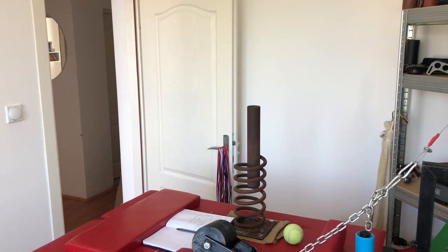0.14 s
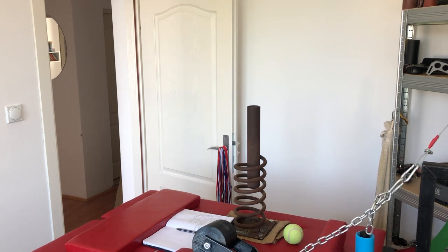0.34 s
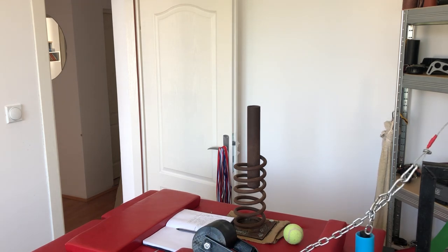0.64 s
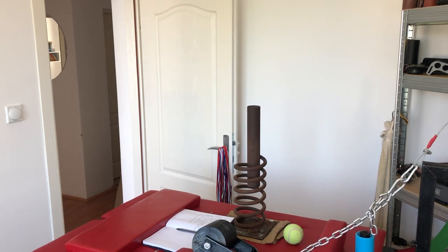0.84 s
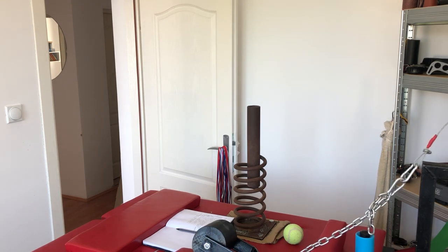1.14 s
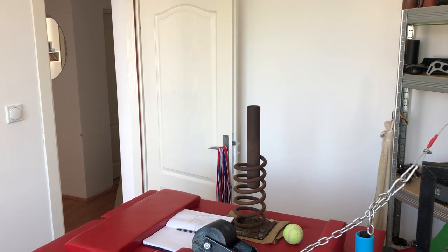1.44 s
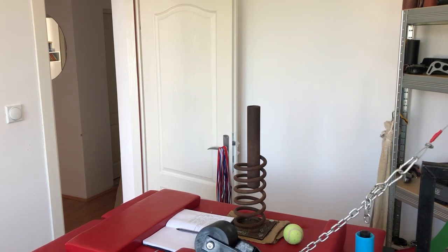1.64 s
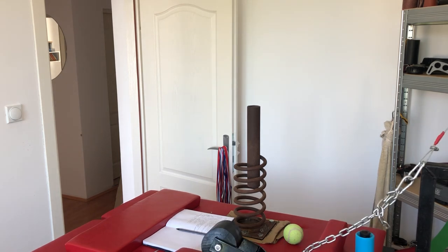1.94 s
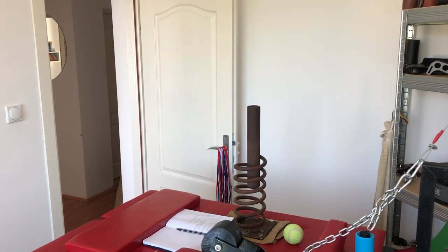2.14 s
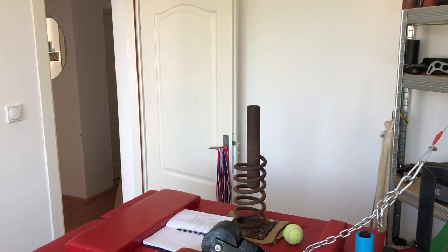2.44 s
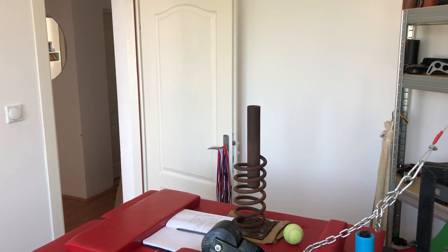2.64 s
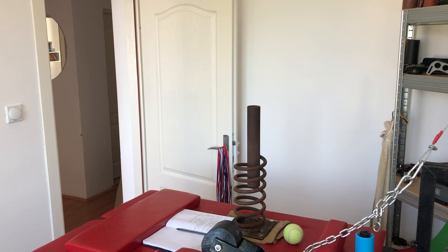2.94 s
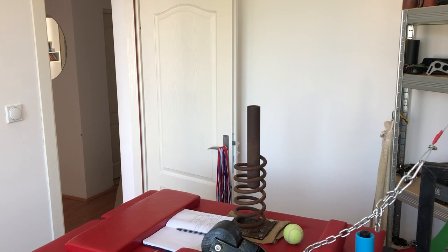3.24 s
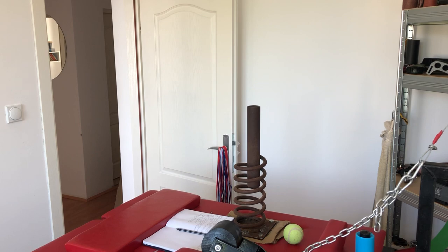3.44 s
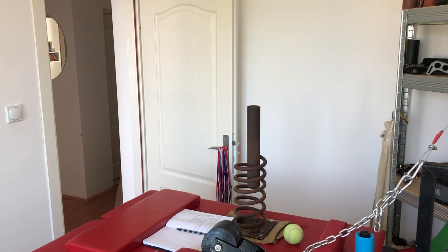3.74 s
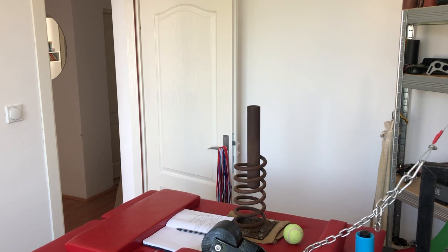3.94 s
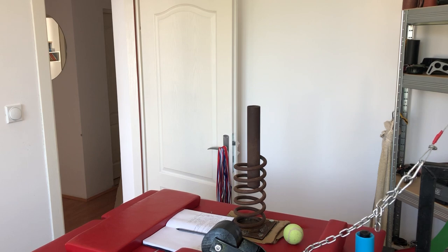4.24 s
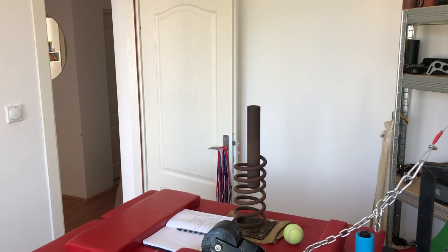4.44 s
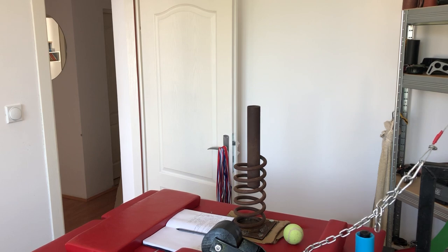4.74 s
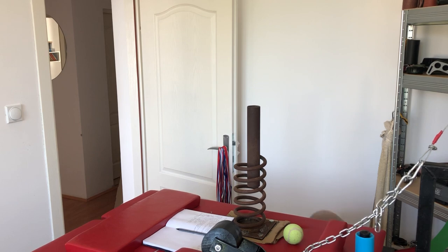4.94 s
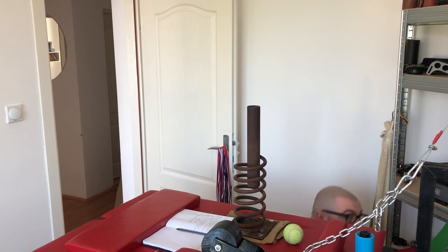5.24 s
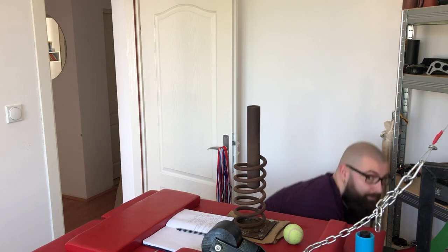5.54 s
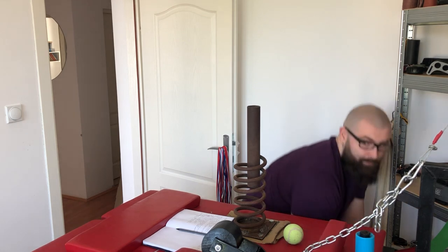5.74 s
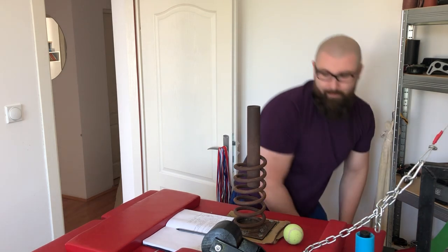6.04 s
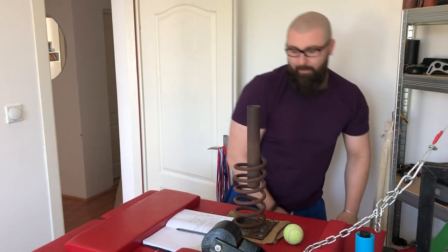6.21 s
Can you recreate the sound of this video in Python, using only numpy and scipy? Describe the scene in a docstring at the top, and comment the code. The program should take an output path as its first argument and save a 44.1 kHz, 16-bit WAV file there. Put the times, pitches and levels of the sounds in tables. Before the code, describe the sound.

Quiet chain ticks, a dragged iron plate's boom and loud ringing clank, then small metallic knocks, settling taps and soft clothing rustle over faint room hiss.

```python
"""Iron weight plates are shifted, dragged and dropped onto a loading pin, below a table in a small bare room.
Each blow rings a large plate, a small plate or the floor as decaying sines, with noise bursts for the contact.
Rumbling floor, grinding iron and a jingling chain are filtered random clicks, and so is the rustle of clothes.
The plates lie out of the microphone's sight, so much of their sound comes as room echo; air, hiss and hum lie below."""
import sys
import numpy as np
from scipy import signal
from scipy.io import wavfile
from scipy.ndimage import uniform_filter1d, minimum_filter1d

SR = 44100
rng = np.random.default_rng(int(sys.argv[2]) if len(sys.argv) > 2 else 0)


def unload_audio(sound):
    """Save the sound as a 16-bit wav file, at the path given as the first command line argument."""
    columns = np.transpose(np.atleast_2d(sound))
    # keep every value between -1 and 1, then stretch to whole-number steps
    steps = np.round(np.clip(columns, -1, 1) * 32767)
    wavfile.write(sys.argv[1], SR, steps.astype(np.int16))


N = 280976

# All levels are set before the mix of direct sound and echo in scene().

# large plate meets the floor or the pin:
# (time [s], floor thud [dB], plate ring [dB], contact [dB], contact tilt [dB per octave])
HEAVY_BLOWS = [(0.017, -38, -82, -46.5, -2), (1.195, -33, -43, -25, -7), (1.228, -27.5, -79, -49, -3),
               (1.403, -32, -72, -43, -5.5), (1.481, -42, -67, -37, -7.5), (1.531, -43, -51, -24.5, -12),
               (1.556, -40, -55, -27, -16), (1.829, -30.5, -74, -30.5, -4.5), (1.868, -4, -54.5, -15.5, -4),
               (1.917, -24.5, -59.5, -29.5, -8.5), (2.141, -55.5, -43.5, -37.5, -10),
               (2.394, -25, -19, -14, -10), (2.428, -29, -3.5, -16.5, -7), (2.462, -19, -21, -33.5, -4),
               (2.485, -21.5, -7.5, -16, -9), (2.531, -33, -25.5, -19.5, -13.5),
               (6.329, -49.5, -90, -61.5, 2)]
# modes of the large plate: (frequency [Hz], level against the ring [dB], t60 [s])
LARGE_PLATE_MODES = [(72, -35, .8), (425, -25, .55), (606, -18, .7), (915, -21, .3), (1120, -19, .25),
                     (1226, -13, .4), (1315, -19, .25), (1739, -20, .3), (2237, -15, .45), (2396, -20, .25),
                     (2666, -14, .35), (2753, -13, .3), (2779, -8, .4), (2803, -8, .4), (2814, 0, .5),
                     (2847, -10, .35), (3550, -24, .36), (3658, -19, .38), (4539, -14, .25),
                     (4571, -6, .33), (5106, -19, .34), (5281, -27, .32), (5450, -26, .24),
                     (5631, -26, .26), (6708, -31, .38), (7644, -34, .2), (7900, -35, .2), (8393, -34, .24),
                     (9082, -37, .22), (10090, -37, .16)]
DENSE_DB, DENSE_T60_S = -27, 0.35   # crowded weak modes, heard as noise, against the ring


def large_plate():
    """Heavy iron rings in long separate modes, with crowded weak modes as decaying noise."""
    times, _, ring_db, _, _ = np.transpose(HEAVY_BLOWS)
    modes = body(LARGE_PLATE_MODES, times, ring_db, spread_db=1.93, chatter_db=-35, chatter_s=0.2)
    dense_db = ring_db + DENSE_DB
    dense = crack(times, dense_db, 2200, 3000, DENSE_T60_S)
    dense += crack(times, dense_db - 7, 4500, 4700, DENSE_T60_S)
    return modes + dense


# small plate is knocked: (time [s], ring [dB], contact [dB], contact tilt [dB per octave])
LIGHT_BLOWS = [(0.029, -51, -40, -1.5), (0.192, -48.5, -37, -26), (0.56, -58, -51.5, 0.5),
               (2.959, -49.5, -46, -4.5), (2.986, -58, -57, 1), (3.054, -66, -44.5, -3.5),
               (3.208, -48, -48.5, -3), (3.248, -56, -51.5, -4), (3.315, -59, -44, -6),
               (3.636, -47.5, -50.5, 1), (3.765, -42.5, -45, -5.5), (3.949, -44.5, -39.5, -3),
               (4.031, -35, -42.5, 4.5), (4.056, -40.5, -37, 4.5), (4.066, -46, -30, -6.5),
               (4.261, -54.5, -51, -1.5)]
# modes of the small plate: (frequency [Hz], level against the ring [dB], t60 [s])
SMALL_PLATE_MODES = [(680, -0.5, 0.25), (752.4, 2, 0.23), (1395, -10.5, 0.16), (2185, -6, 0.23),
                     (2339, 4, 0.094), (3336, -9, 0.019), (4000, 3.5, 0.024), (4130, 3.5, 0.15),
                     (4220, -4.5, 0.36), (4820, 7, 0.039), (5890, -0.5, 0.023), (7140, -7, 0.067),
                     (8560, -19, 0.046), (9540, -14, 0.056), (11160, -28, .02), (12800, -25, .015)]


def small_plate():
    """A lighter plate rings in shorter modes when knocked."""
    times, ring_db, _, _ = np.transpose(LIGHT_BLOWS)
    return body(SMALL_PLATE_MODES, times, ring_db, spread_db=3.0, chatter_db=-27, chatter_s=0.069)


# modes of the floor boards: (frequency [Hz], level against the thud [dB], t60 [s])
FLOOR_MODES = [(79.4, -26.5, 0.24), (109.8, -28.5, 0.18), (200, -19.5, 0.21), (259.3, -11, 0.048),
               (346, -5.5, 0.12), (374.7, -7.5, 0.14), (437.2, -1.5, 0.11), (551, -2, .1),
               (602, -3.5, 0.12), (678, -5, 0.11), (734, -8, 0.19), (817, -12, 0.35), (1123, -13, 0.049)]
LIGHT_THUD_DB = -14   # floor under a light blow, against its contact
BOOM_DB, BOOM_T60_S = -6, 0.12   # dense low modes, heard as a noisy boom, against the thud


def floor():
    """The boards answer every plate blow, taking a few ms to start swinging."""
    heavy_s, heavy_thud_db, _, _, _ = np.transpose(HEAVY_BLOWS)
    light_s, _, light_db, _ = np.transpose(LIGHT_BLOWS)
    times = np.r_[heavy_s, light_s]
    thud_db = np.r_[heavy_thud_db, light_db + LIGHT_THUD_DB]
    thud = body(FLOOR_MODES, times + 0.0027, thud_db, spread_db=1.0, chatter_db=-28, chatter_s=0.084)
    return thud + crack(times + 0.0024, thud_db + BOOM_DB, 180, 800, BOOM_T60_S)


# chain links click against the hook: (time [s], click [dB], top against the click [dB])
LINK_CLICKS = [(0.164, -45, 0), (0.249, -49, 6), (0.263, -49.5, 7.5), (0.435, -55, -18), (0.513, -45, -21),
               (0.774, -54.5, -7), (0.944, -50.5, -13), (1.041, -44.5, -14), (4.317, -58, -15)]
# modes of the steel hook at the chain's end: (frequency [Hz], level against the ring [dB], t60 [s])
HOOK_MODES = [(1728, -12, .3), (2830, -8, 0.19), (3736, -3.5, 0.21), (4030, -7, 0.18), (4200, -1.5, .27),
              (4980, -1.5, 0.24), (6200, -10, .25), (6990, -10, 0.23), (8250, 2, .23), (8950, -9, .2),
              (9970, -4, .2), (12900, -16, .12)]
LINK_RING_DB = -9.5   # ring of the hook, against the click


def hook():
    """Each clicking link sets the steel hook ringing."""
    times, click_db, _ = np.transpose(LINK_CLICKS)
    return body(HOOK_MODES, times, click_db + LINK_RING_DB, spread_db=2.5, chatter_db=-36.0, chatter_s=0.063)


CLACK_BUMP_DB = 4.5   # lift of a plate contact's middle band
RATTLE_DB, RATTLE_T60_S = -17, 0.25   # against the clack or tick it follows


def contacts():
    """Bare iron meets in noise bursts; loose iron rattles on after each light blow and link click."""
    heavy_s, _, _, heavy_db, heavy_tilt = np.transpose(HEAVY_BLOWS)
    light_s, _, light_db, light_tilt = np.transpose(LIGHT_BLOWS)
    link_s, link_db, top_db = np.transpose(LINK_CLICKS)

    knock_db = np.r_[heavy_db, light_db]
    tilt = np.r_[heavy_tilt, light_tilt]
    # the tilt acts over octaves above the knock
    clack_db = np.r_[knock_db + CLACK_BUMP_DB + 2.2 * tilt, link_db]
    tick_db = np.r_[knock_db + 3.4 * tilt, link_db + top_db]
    knock_db = np.r_[knock_db, link_db - 14]
    cracks = contact(np.r_[heavy_s, light_s, link_s], knock_db, clack_db, tick_db)

    loose = slice(len(heavy_s), None)   # light blows and link clicks
    loose_s = np.r_[light_s, link_s]
    cracks += crack(loose_s, clack_db[loose] + RATTLE_DB, 2830, 6100, RATTLE_T60_S)
    cracks += crack(loose_s, tick_db[loose] + RATTLE_DB, 5760, 9500, RATTLE_T60_S)
    return cracks


def contact(times, knock_db, clack_db, tick_db):
    """Dull knock, middle clack and bright tick of bare iron meeting."""
    knock = crack(times, knock_db, 420, 1900, 0.035)
    clack = crack(times, clack_db, 2700, 7500, 0.017)
    tick = crack(times, tick_db, 5300, 15000, 0.025)
    return knock + clack + tick


# plate rocking on the floor: (time [s], tap level [dB])
ROCKING = [(4.367, -36.5), (4.403, -35), (4.437, -46), (4.454, -65), (4.478, -64)]
ROCK_HZ, ROCK_T60_S = 640, 0.044


def rocking():
    """A leaning plate taps the floor a few times as it settles: softened clicks ring one short mode."""
    times, db = np.transpose(ROCKING)
    soft_taps = signal.lfilter([0.18], [1, -0.95], clicks(times, db))
    return ring(soft_taps, ROCK_HZ, ROCK_T60_S)


# plate dragged over the pin, in separate spans: (time [s], rumble level [dB])
DRAG_SPANS = [
    [(1.25, -35), (1.352, -54), (1.444, -34), (1.53, -32), (1.556, -30.5), (1.714, -45), (1.814, -41.5),
     (1.86, -25)],
    [(1.96, -22.5), (2.0, -35), (2.098, -38.5), (2.17, -44), (2.348, -60.5), (2.385, -44)],
]
GRIND_DB = -13.5   # against the rumble
# modes set ringing by the shaken chain: (frequency [Hz], level [dB], t60 [s]); only their balance counts; the
# first, at 4570 Hz, is the large plate singing along, the rest belong to the chain
CHAIN_MODES = [(4570, -5.5, .05), (7440, -6.5, .04), (7700, -2.5, 0.027), (8140, 4.5, 0.022),
               (8900, -5, 0.057), (8300, 0.5, .03), (9150, -0.5, .04), (9500, -5.5, .03),
               (10000, -5.5, 0.014), (11400, -7, 0.017), (12910, -8, .03)]
# chain is shaken: (peak time [s], level [dB], rise [s], fall [s])
SHAKES = [(1.556, -42, .03, 0.11), (1.837, -37.5, .08, .15), (2.098, -41.5, .035, 0.19),
          (2.385, -50.5, .04, .1)]


def drag():
    """Rust grains catch and slip: the floor rumbles, the iron grinds, the shaken chain jingles and the large
    plate sings along."""
    slips = grit(1500, 1.3)
    rumble = 0
    for k, (hz, db, t60) in enumerate(FLOOR_MODES):
        # under the dragged plate the floor modes die sooner; signs alternate
        rumble = rumble + (-1) ** k * from_db(db) * ring(slips, hz, 0.23 * t60)
    grind = from_db(GRIND_DB) * rms_one(band(slips, 1200, 3500))
    links = sum(from_db(db) * ring(grit(250, 3.3), hz, t60) for hz, db, t60 in CHAIN_MODES)
    jingle = swell(*np.transpose(SHAKES)) * rms_one(band(links, 3500, 14000))
    return span_gain(DRAG_SPANS) * (rms_one(rumble) + grind) + jingle


# clothes and hands move: (peak time [s], level [dB], tilt [dB per octave], rise [s], fall [s])
MOVES = [(0.04, -51.5, -3.5, 0.28, 0.34), (0.22, -53.5, -11.5, 0.21, 0.16), (0.573, -58.5, -2, 0.18, 0.48),
         (3.085, -52, -6, 0.28, 0.18), (3.29, -56, -7, .15, 0.36), (4.33, -57, -13, 0.27, 0.25),
         (4.5, -58, -3.5, 0.14, 0.19), (4.68, -62, -.5, 0.44, 0.56), (5.38, -57.5, -2.5, 0.26, 0.24),
         (5.6, -67, 2.5, 0.18, 0.19), (6.06, -56, -2.5, 0.27, 0.11), (6.25, -56.5, -4, .3, 0.34)]


def rustle():
    """Cloth fibres crackle densely: random clicks in three bands swell with each movement."""
    times, db, tilt, rise_s, fall_s = np.transpose(MOVES)
    # the tilt acts over octaves above the dull band
    dull = swell(times, db, rise_s, fall_s) * rms_one(band(grit(5000, 1.4), 260, 1600))
    middle = swell(times, db + 2.3 * tilt, rise_s, fall_s) * rms_one(band(grit(6000, 1.5), 2300, 6250))
    bright = swell(times, db + 3.3 * tilt, rise_s, fall_s) * rms_one(band(grit(9000, 1.5), 5800, 18000))
    return dull + middle + bright


# decay of the small bare room: (frequency [Hz], t60 [s])
ROOM_T60 = [(100, 0.88), (500, 0.55), (1400, 0.54), (3700, 0.39), (9700, 0.19), (16000, 0.38)]


def room(x):
    """Dense echoes: noise that builds up in some ms and dies band by band; energy 1."""
    t = np.arange(SR) / SR
    edges = 60 * 2 ** np.arange(0, 8.1, 0.5)
    tail = 0
    for low, high in zip(edges, edges[1:]):
        fade = from_db(-60 * t / at_hz(ROOM_T60, np.sqrt(low * high)))
        tail = tail + band(rng.standard_normal(SR), low, high) * fade
    tail = tail * (1 - np.exp(-t / 0.0023))
    return signal.fftconvolve(x, tail / np.sqrt(np.sum(tail ** 2)))[:N]


# colour of room air and microphone hiss: (frequency [Hz], relative band gain [dB])
AIR_COLOUR = [(15, -43), (25, -5.5), (87, 1.5), (175, -5.5), (217, -2.5), (285, -17), (451, -10.5),
              (796, -17.5), (887, -14), (1020, -14), (1740, -25), (6740, -28), (14800, -45.5), (16000, -40)]
AIR_DB = -59   # rms of the whole hiss
# hum tones: (centre frequency [Hz], middle rms level [dB])
HUM_TONES = [(152, -64.5), (193, -66)]


def air():
    """Still room air and microphone hiss in half-octave noise bands, with two wavering hum tones."""
    edges = 22 * 2 ** np.arange(0, 10, 0.5)
    hiss = 0
    for low, high in zip(edges, edges[1:]):
        gain = from_db(at_hz(AIR_COLOUR, np.sqrt(low * high)))
        hiss = hiss + gain * band(rng.standard_normal(N), low, high)
    hum = 0
    for hz, db in HUM_TONES:
        level = from_db(db + 2.5 * drift(6)) * np.sqrt(2)
        phase = 2 * np.pi * np.cumsum(hz + 3.0 * drift(8)) / SR
        hum = hum + level * np.sin(phase)
    return from_db(AIR_DB) * rms_one(hiss) + hum


def body(modes, times, db, spread_db, chatter_db, chatter_s):
    """Every blow strikes each mode with a strength of its own; the loose iron chatters on for a moment after it."""
    luck = rng.normal(0, 1, (len(times), len(modes)))
    chatter = from_db(chatter_db) * grit(5000, 1.0)
    out = 0
    for k, (hz, level_db, t60) in enumerate(modes):
        hits = clicks(times, db + level_db + spread_db * luck[:, k])
        drive = hits + chatter * fading(hits, chatter_s)
        out = out + (-1) ** k * ring(drive, hz, t60)
    return out


def crack(times, db, low_hz, high_hz, t60):
    """Bursts of band noise that start at once and die away exponentially."""
    burst = fading(clicks(times, db), t60) * rng.standard_normal(N)
    return band(burst, low_hz, high_hz) * np.sqrt(SR / 2 / (high_hz - low_hz))   # same power in any band


def fading(hits, t60):
    """Each click becomes an envelope that falls 60 dB in t60 seconds."""
    return signal.lfilter([1], [1, -from_db(-60 / (t60 * SR))], hits + 1e-18)


def ring(hits, hz, t60):
    """A unit click sets a decaying sine of starting height 1 ringing."""
    r, w = from_db(-60 / (t60 * SR)), 2 * np.pi * hz / SR
    return signal.lfilter([0, np.sin(w)], [1, -2 * r * np.cos(w), r * r], hits + 1e-18)


def clicks(times, db):
    """Single-sample clicks at the given times."""
    out = np.zeros(N)
    out[(np.asarray(times) * SR).astype(int)] = from_db(db)
    return out


def grit(per_s, spread_db):
    """Random clicks of uneven size and either sign; rms 1."""
    sizes = from_db(spread_db * np.minimum(rng.exponential(1, N), 4)) * rng.choice([-1, 1], N)
    return rms_one(sizes * (rng.random(N) < per_s / SR))


def swell(peak_s, db, rise_s, fall_s):
    """Sum of swells, straight in dB, that are 20 dB down at their rise and fall times."""
    coarse_n = np.arange(0, N, 64)
    late = coarse_n[:, None] / SR - peak_s
    drop_db = 20 * np.where(late < 0, -late / rise_s, late / fall_s)
    return np.interp(np.arange(N), coarse_n, from_db(db - drop_db).sum(axis=1))


def span_gain(spans):
    """Gain in time, straight in dB between points and silent between the spans."""
    t = np.arange(N) / SR
    return sum(from_db(np.interp(t, *np.transpose(rows), -200, -200)) for rows in spans)


def drift(rate_hz):
    """Slow noise of rms 1."""
    r = np.exp(-2 * np.pi * rate_hz / SR)
    return rms_one(signal.lfilter([1], [1, -2 * r, r * r], rng.standard_normal(N + SR))[SR:])


def band(x, low_hz, high_hz):
    """Band-pass filter."""
    sos = signal.butter(2, [low_hz, min(high_hz, 19000)], "band", fs=SR, output="sos")
    return signal.sosfilt(sos, x + 1e-18)


def at_hz(points, hz):
    """Value of a curve at hz, straight over log frequency."""
    curve_hz, values = np.transpose(points)
    return np.interp(np.log(hz), np.log(curve_hz), values)


def rms_one(x):
    """Scale to rms 1."""
    return x / np.sqrt(np.mean(x ** 2) + 1e-20)


def from_db(db):
    """Decibels to amplitude."""
    return 10 ** (np.asarray(db) / 20)


def scene():
    """Mix the direct sound with its room echoes, then the rustle and the air."""
    large = large_plate()
    damped = small_plate() + hook() + floor() + rocking() + drag()
    cracks = contacts()
    direct = large + from_db(-5) * damped + from_db(-1.0) * cracks
    # the plates lie out of sight under the table: the contact cracks arrive mostly as echoes
    to_room = from_db(-8.5) * large + from_db(-7.5) * damped + from_db(2.5) * cracks
    return (direct + room(to_room) + rustle() + air())[None]


LIMIT_DB, RELEASE_DB_S = -1.5, 60   # limiter ceiling [dB full scale], release [dB per s]
CUTOFF_HZ = 16150


def record(dry):
    """The microphone drops the deep bass, a look-ahead limiter holds the loudest clanks, the top is cut."""
    dry = signal.sosfilt(signal.butter(3, 48, "high", fs=SR, output="sos"), dry)
    ramp = RELEASE_DB_S * np.arange(N) / SR
    over_db = np.maximum(20 * np.log10(np.abs(dry[0]) + 1e-9) - LIMIT_DB, 0)
    held_db = np.maximum.accumulate(over_db + ramp) - ramp
    # widen the reduction about 1 ms each way, then smooth it
    ahead_db = uniform_filter1d(-minimum_filter1d(-held_db, size=89), size=45)
    limited = dry * from_db(-ahead_db)
    return signal.sosfilt(signal.cheby2(20, 60, CUTOFF_HZ, fs=SR, output="sos"), limited)


dry = scene()
out = record(dry)
unload_audio(out)
```